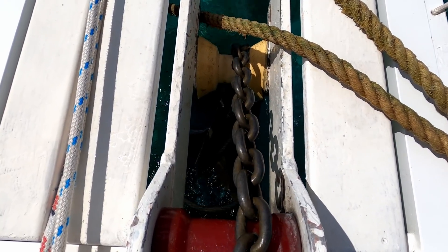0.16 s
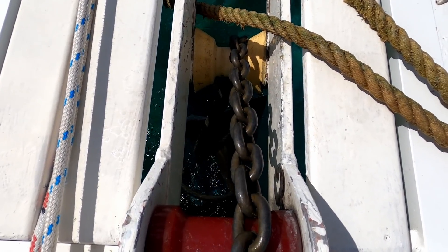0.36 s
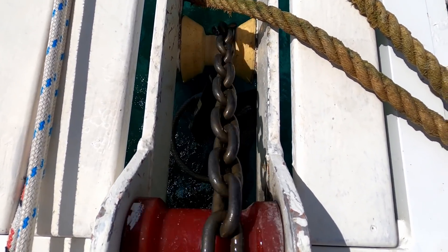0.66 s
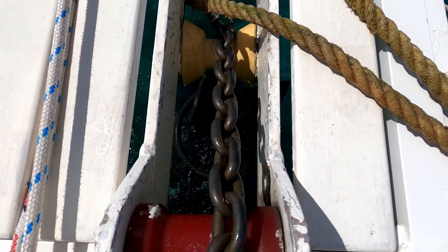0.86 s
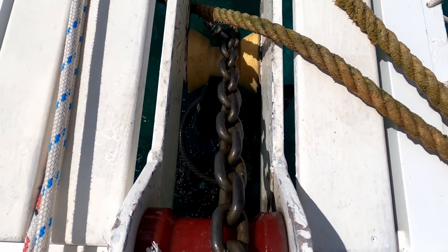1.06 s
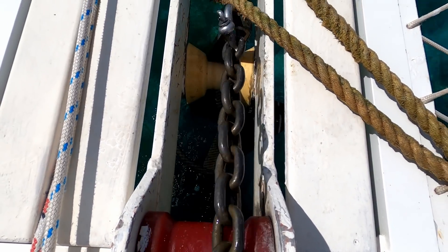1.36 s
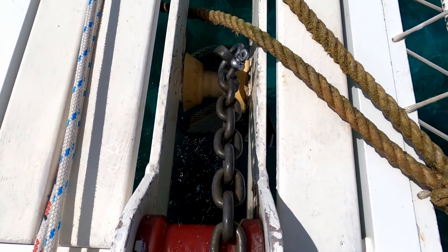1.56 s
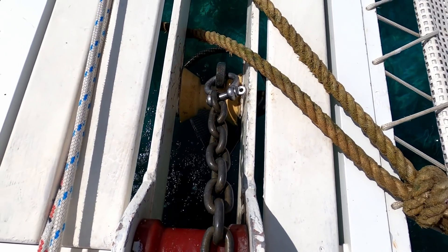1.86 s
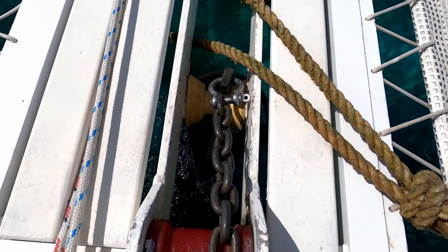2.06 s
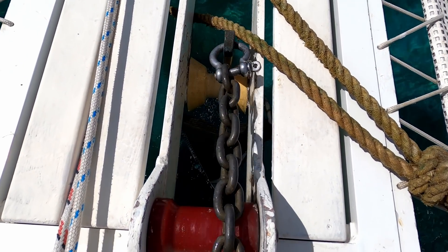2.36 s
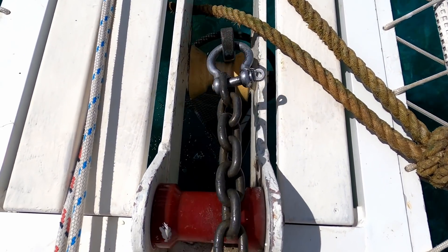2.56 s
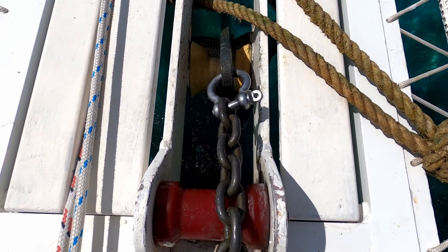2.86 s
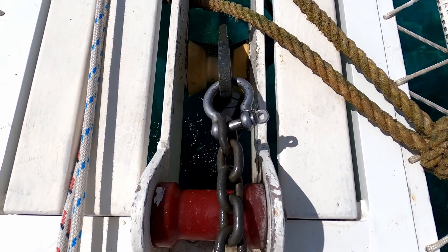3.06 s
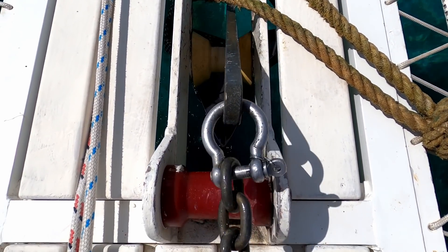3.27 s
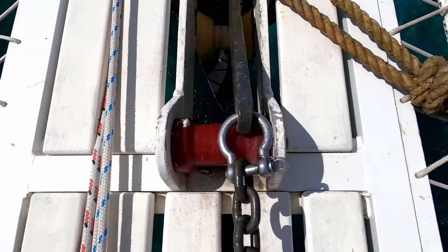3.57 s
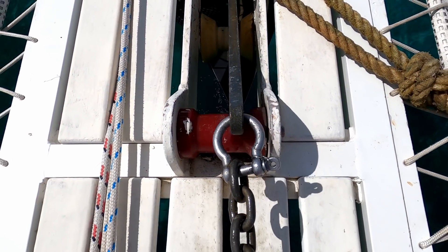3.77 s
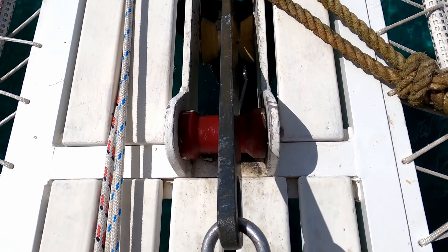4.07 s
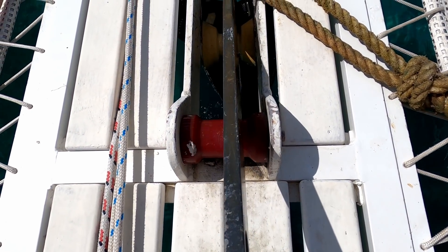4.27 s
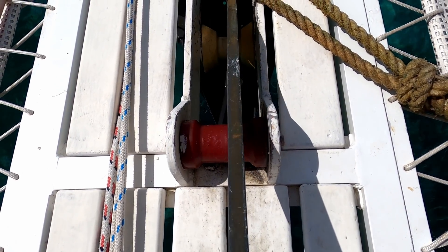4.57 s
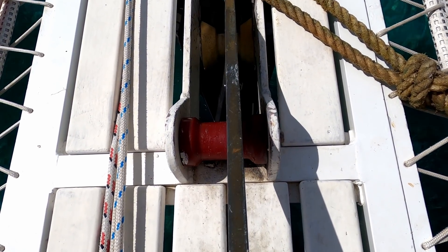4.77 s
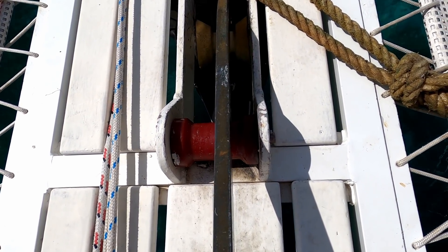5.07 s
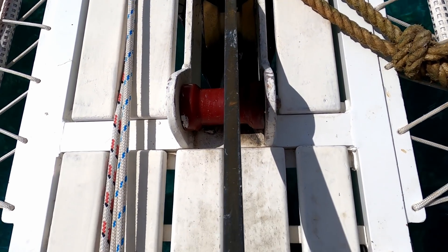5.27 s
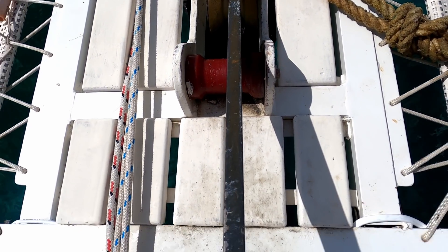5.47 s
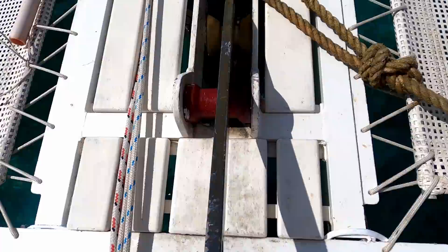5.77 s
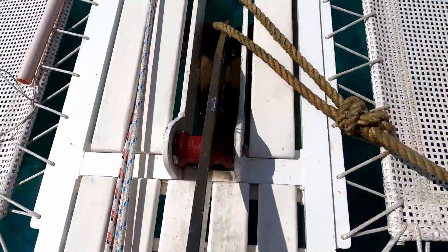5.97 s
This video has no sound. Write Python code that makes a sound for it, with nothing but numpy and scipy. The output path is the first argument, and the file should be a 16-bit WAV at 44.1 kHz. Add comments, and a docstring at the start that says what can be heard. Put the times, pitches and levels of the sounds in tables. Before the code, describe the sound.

Outdoors on deck, microphone near the roller: bright, gritty chain rattle in separate bursts over low engine rumble. Two seconds in, it briefly pauses with just a dull jolt, then sharper steel blows return, with short metallic pings and a short hollow echo from the chain channel. A deep knock lands as the anchor shank seats, the hull rumbles briefly, and the idle and wash are left alone.

```python
"""At the bow of a boat, an anchor chain is winched in over a roller in short pulls, close to a microphone.
Links grind and clank: random grit and short noise bursts set the tuned modes of the steel ringing.
The frame, deck and hull boom under many small blows, one heavy thud lands, and lone modes ping.
An engine idles below deck as a stack of sine waves, with shaped noise for the engine and water wash."""
import sys
import numpy as np
from scipy import signal
from scipy.io import wavfile
from scipy.ndimage import uniform_filter1d, map_coordinates

SR = 44100
rng = np.random.default_rng(int(sys.argv[2]) if len(sys.argv) > 2 else 0)


def pcm_store(signal):
    """Save signal as 16-bit PCM."""
    levels = np.round(np.clip(np.atleast_2d(signal), -1, 1) * 32767)
    wavfile.write(sys.argv[1], SR, levels.astype(np.int16).T)


N = 270333

ENGINE_HZ, ENGINE_LEAD_S = 29.725, 0.0102  # rate of the first engine order, and its head start
# ringing modes of the chain links: (frequency [Hz], width [Hz], level [dB])
LINK_MODES = [(2746, 61, 5.5), (3840, 58, 1.5), (4837, 260, 8.5), (5270, 400, 11), (6350, 990, -2.5),
              (7540, 400, 2), (8350, 230, -1.5), (9710, 600, -5.5), (12200, 1800, -7)]
# ringing modes of the roller frame: (frequency [Hz], width [Hz], level [dB])
FRAME_MODES = [(975, 29, 6), (1093, 60, 5), (1321, 81, 4), (1543, 82, 0), (1720, 53, -2.5), (2127, 240, 1),
               (2435, 19, 0), (2640, 17, -3), (2773, 110, -1.5), (3320, 130, -1), (3500, 33, -6),
               (3834, 170, -3)]
# ringing modes of the deck: (frequency [Hz], width [Hz], level [dB])
DECK_MODES = [(243, 10, -8.5), (272.6, 30, -3.5), (326.6, 65, 7.5), (430, 28, -1.5), (493, 56, -7),
              (550, 2.7, -2), (597, 5.5, -7), (658, 3.5, 1.5), (775, 5.9, -19)]


def gain_of(db):
    """Turns decibels into a plain multiplier."""
    return 10 ** (np.asarray(db) / 20)


def evened(x):
    """Scales a signal to an rms (average strength) of 1."""
    return x / np.sqrt(np.mean(x ** 2) + 1e-20)


def curves(rows):
    """Draws straight lines between the rows of a table: one value per sample for each column."""
    s, *columns = np.transpose(rows)
    return [np.interp(np.arange(N) / SR, s, c) for c in columns]


def add(mix, s, sound):
    """Mixes a sound in at time s, cut off at the end of the mix."""
    part = mix[round(s * SR):][:len(sound)]
    part += sound[:len(part)]


def band(x, lo_hz, hi_hz, order=2):
    """Keeps mainly the frequencies between two limits."""
    return signal.sosfilt(signal.butter(order, [lo_hz, hi_hz], "band", fs=SR, output="sos"), x)


def ring(x, modes, shifting_db=0, count=1):
    """Adds up resonances, which can trade strength as the contact point moves."""
    out, power, steady = np.zeros(len(x)), 0, 0
    for hz, width, db in modes:
        r = np.exp(-np.pi * width / SR)
        top = [(1 - r * r) / 2, 0, (r * r - 1) / 2]  # gives a gain of 1 at the peak
        bottom = [1, -2 * r * np.cos(2 * np.pi * hz / SR), r * r]
        mode = x
        for _ in range(count):  # filtering twice makes darker valleys between the modes
            mode = signal.lfilter(top, bottom, mode)
        gain = gain_of(db)
        if shifting_db:
            gain = gain * wander(0.018, shifting_db)
        out += gain * mode
        power = power + gain ** 2 * width
        steady = steady + gain_of(db) ** 2 * width
    return out * np.sqrt(steady / power)  # evens out the total strength while the modes trade


def body(x, modes, lo_hz, hi_hz, broad_db, shifting_db=0):
    """A struck part: clear modes over a broad mass of weak ones, which is the input let through."""
    return band(ring(x, modes, shifting_db) + gain_of(broad_db) * x, lo_hz, hi_hz)


def grit(per_s, spread_db):
    """Small impacts at random moments, of uneven size and either sign."""
    size_db = spread_db * np.minimum(rng.exponential(1, N), 4)
    size = gain_of(size_db) * rng.choice([-1, 1], N)
    return evened(size * (rng.random(N) < per_s / SR))


def wander(span_s, depth_db):
    """A random gain around 1, drifting in straight lines between points span_s apart."""
    steps = np.arange(0, N / SR + 1, max(span_s, 0.002))
    drift = evened(uniform_filter1d(rng.standard_normal(len(steps)), size=2))
    return np.interp(np.arange(N) / SR, steps, gain_of(depth_db * drift))


def while_on(rows):
    """1 between the first and last row of a table, with quick edges."""
    t = np.arange(N) / SR
    return np.clip(np.minimum(t - rows[0][0], rows[-1][0] - t) / 0.02, 0, 1)


def grind_levels():
    """Gain of the grinding on the roller, one curve for each stretch of contact."""
    # links grinding on the roller, one list per stretch of contact: (time [s], level [dB])
    stretches = [
        [(.57, -82.5), (.676, -47.5), (.725, -51), (.745, -57), (.78, -51.5), (.96, -50.5), (.987, -62)],
        [(.992, -52.5), (1.19, -47.5), (1.21, -46.5), (1.328, -42.5), (1.508, -51.5), (1.53, -66.5),
         (1.63, -58)],
        [(2.4, -41), (2.42, -46.5), (2.53, -45.5), (2.55, -58.5), (2.634, -55.5), (2.865, -61.5)],
        [(3.02, -53), (3.22, -54), (3.245, -62), (3.66, -92)],
        [(3.8, -61), (3.9, -47.5), (3.99, -63), (4.085, -45.5), (4.13, -61.5)],
        [(4.14, -57), (4.208, -43.5), (4.29, -49), (4.33, -59), (4.376, -42.5), (4.445, -65.5)],
        [(4.45, -52), (4.56, -50), (4.645, -56.5), (4.71, -52.5), (4.79, -81.5)],
    ]
    return [while_on(rows) * gain_of(curves(rows)[0]) for rows in stretches]


def clinks():
    """Small separate link contacts: random impacts set off short rings, each of its own pitch."""
    t, out = np.arange(1500) / SR, np.zeros(N)
    for hz in np.geomspace(1500, 10000, num=24) * rng.uniform(0.95, 1.05, size=24):
        one_ring = gain_of(-60 * t / 0.022) * np.sin(2 * np.pi * hz * t)
        out += signal.oaconvolve(grit(5, 3.0), one_ring)[:N]
    return evened(out)


def grinding():
    """Links rub on the roller: dense grit rings their modes, over a rough scrape and small clinks."""
    # how clearly the link modes sing over the scrape, one value per stretch: level [dB]
    sing_levels = [0.5, -0.5, -1, 0, -6.5, 0.5, -1]
    # upper link modes, one value per stretch; shackle and anchor shank scrape duller than chain: level [dB]
    sheen_levels = [6, 3.5, 5, 7.5, 0.5, -1, 2.5]
    rub = grit(1500, 0.78)
    links = evened(band(ring(rub, LINK_MODES, shifting_db=4, count=2), 2200, 15000))
    # the pitch drifts a little: no two links ring at quite the same pitch
    links = map_coordinates(links, [np.cumsum(wander(0.05, 0.2))])
    upper = band(links, 7900, 14000)
    scrape = gain_of(-6.0) * evened(band(rub, 2800, 8000))
    scrape = scrape + gain_of(-22.0) * evened(band(rub, 10000, 17000))
    scrape = scrape + gain_of(-6.0) * clinks()
    out = np.zeros(N)
    for level, sing_db, sheen_db in zip(grind_levels(), sing_levels, sheen_levels):
        singing = gain_of(sing_db) * (links - upper) + gain_of(sheen_db) * upper
        out += level * (scrape + singing)
    judder = wander(0.0091, 1.7) * wander(0.017, 1.5)
    return judder * out


def clanks():
    """Each clank is a short chatter of steel on steel; the modes near where it lands ring most."""
    # clanks: (time [s], level [dB], centre [Hz], link share [dB], deck share [dB],
    # chatter time to fall 60 dB [s], limited below)
    blows = [(.0064, -52, 940, -6.5, -30, 0.13), (0.5683, -44, 2810, -7.5, 0, 0.099),
             (0.6015, -38, 2750, -1.5, -24, 0.069), (0.6335, -30, 1060, -45, -5, 0.075),
             (.6757, -34, 2460, -12, 0, 0.034), (0.7163, -34.5, 2680, -7, -4, 0.017),
             (0.813, -39, 1520, 4, -9.5, 0.032), (0.8309, -32.5, 2800, -13, -2, 0.065),
             (0.858, -29, 2530, -25, -6.5, 0.045), (.9175, -30.5, 2770, -26, -8, 0.069),
             (0.941, -34, 2740, 0, -5, 0.028), (1.029, -36, 2090, -2.5, -9, 0.1),
             (1.1039, -36.5, 2300, -3.5, -18, 0.038), (1.116, -30, 2480, -4.5, -8.5, 0.047),
             (1.1344, -29, 1080, -15.5, -3.5, 0.13), (1.2655, -28.5, 1270, -6.5, -5, 0.076),
             (1.309, -34, 2730, 3.5, -13, 0.045), (1.3277, -32, 2800, 6, -24.5, 0.02),
             (1.387, -33, 1100, -23, 0.5, 0.045), (1.4066, -29, 2570, -12, -6, 0.069),
             (1.5414, -33, 1770, -13, -18, 0.052), (1.5682, -34, 1240, -23, -6, 0.087),
             (1.5954, -35.5, 1320, -10.5, 7, 0.06), (1.701, -44.5, 1260, -16, -13, 0.1),
             (1.7761, -44, 1230, -23, 5, 0.05), (1.9962, -46, 1040, -36, 3, 0.073),
             (2.2163, -53.5, 1100, -16, -7, .05), (2.2973, -54.5, 990, -4.5, -20, 0.37),
             (2.3361, -30.5, 2140, -2.5, -29, 0.078), (2.3792, -27.5, 1150, -23, -4.5, 0.088),
             (2.4067, -34.5, 2470, -15, 8, 0.11), (2.564, -26, 2480, -19, -21, 0.029),
             (2.586, -31, 1150, -15, -31, 0.036), (2.625, -35, 1740, -7.5, -19, .04),
             (2.668, -31, 2620, -21, 0, 0.036), (2.7064, -31, 1410, -35, -15, 0.038),
             (2.776, -45, 2270, -28, -23.5, .25), (2.9125, -53.5, 2170, -5, -11.5, 0.014),
             (3.0105, -30.5, 2200, -3.5, -24.5, 0.06), (3.043, -28, 980, -29.5, 2.5, 0.086),
             (3.0934, -23, 2080, -37, -10, 0.048), (3.265, -24, 1970, -13, -12, 0.047),
             (3.3577, -33, 950, -17, -5.5, 0.1), (3.4093, -21.5, 1950, -19.5, -12, 0.066),
             (3.51, -36.5, 2190, -13, -2.5, 0.06), (3.5903, -22, 1260, -19, -15, 0.087),
             (3.787, -28, 2004, -6.5, -26, 0.063), (3.826, -31, 1000, -29, -6, 0.078),
             (3.8648, -25.5, 1400, -19, -11, 0.041), (3.9255, -28.5, 1640, -30, -7, 0.084),
             (3.938, -22, 1300, -25, -22, 0.023), (3.9598, -27, 2720, -28, -13, 0.021),
             (3.9771, -30.5, 2420, -28, 0, 0.037), (4.0183, -21, 1700, -20, -9, 0.042),
             (4.0675, -28.5, 1320, -30, -19, .06), (4.14, -21.5, 1540, -25, -17, 0.039),
             (4.3497, -36, 1400, -12.5, -10.5, 0.094), (4.4511, -28, 1900, -6, -23, 0.061),
             (4.4855, -27.5, 1000, -28, 0, 0.059), (4.563, -33.5, 1310, -10.5, -6, 0.095),
             (4.6305, -23, 1830, -25, -17.5, 0.034), (4.6618, -24, 1890, -14, -11, 0.036),
             (4.685, -31.5, 1520, -22.5, -5, 0.041), (4.698, -26, 1540, -27, -5, 0.039),
             (4.7130, -32, 3320, -24.5, -11, 0.043), (4.7245, -19, 2240, -26, -9.5, 0.022),
             (4.7975, -34, 1270, -25, -13.5, 0.03), (4.943, -47, 2010, -24, 5.5, 0.043),
             (5.7605, -59, 3000, -13.5, -11, 0.022), (5.823, -64, 2800, -17, -15, .025),
             (5.8534, -52, 2160, -7, -19, .03), (5.878, -55, 2200, -18, -20, 0.028),
             (5.894, -44, 1800, -10, -10, 0.024), (6.01, -52.5, 2300, -13, -11, 0.019),
             (6.019, -51, 1890, -22, -4, 0.025)]
    out, t = np.zeros(N), np.arange(5000) / SR
    for s, db, centre_hz, link_db, deck_db, t60 in blows:
        fade_db = -60 * (t / np.clip(t60, 0.01, 0.3)) ** 1.57  # holds a moment, then dies fast
        chatter = rng.standard_normal(len(t)) * gain_of(fade_db) * (1 - np.exp(-t / 0.0018))
        near = [(hz, width, m - 4.8 * abs(np.log2(hz / centre_hz))) for hz, width, m in FRAME_MODES]
        near.append((centre_hz, 110, 5.0))  # the spot itself rings too
        parts = [(near, 0.42 * centre_hz, 2.35 * centre_hz, 0),
                 (LINK_MODES, 4300, 10000, link_db),
                 (DECK_MODES, 230, 950, deck_db)]
        sound = np.zeros(len(t))
        for modes, lo, hi, part_db in parts:
            luck = rng.standard_normal((13, 2))  # every blow shifts the pitches and levels a little
            struck = [(hz * (1 + 0.017 * a), 1.9 * width + 30, m + 4.4 * b)
                      for (hz, width, m), (a, b) in zip(modes, luck)]
            part = band(body(chatter, struck, lo, hi, -17.0), 0.57 * lo, 2.1 * hi)
            sound += gain_of(part_db) * part / abs(part).max()
        smooth_end = np.minimum(t[::-1] / 0.03, 1)
        add(out, s, gain_of(db) * sound * smooth_end)
    return out


def hauling():
    """The running chain shakes frame, deck and hull with uneven small blows."""
    # ringing modes of the hull: (frequency [Hz], width [Hz], level [dB])
    hull_modes = [(87.4, 54, -2), (107, 42, 9.5), (151.1, 14, 8.5), (166, 9.1, -7)]
    # one list per pull of the winch, the second a mere jolt:
    # (time [s], deck boom level [dB], hull drumming level [dB])
    winch_pulls = [
        [(0.568, -65, -59), (0.652, -42, -44), (1.216, -50, -43.5), (1.282, -37, -36), (1.498, -50.5, -44.5),
         (1.608, -43.5, -36.5), (1.7, -53, -62)],
        [(1.96, -72, -50), (2.002, -41.5, -40.5), (2.032, -55, -36), (2.08, -68, -47)],
        [(2.338, -58, -54), (2.382, -37.5, -53.5), (2.476, -45.5, -37.5), (2.534, -33.5, -37.5),
         (2.564, -38, -37), (2.84, -57, -57), (2.87, -59.5, -53)],
        [(3.012, -56, -59), (3.05, -34.5, -40.5), (3.202, -42.5, -37.5), (3.222, -35.5, -40), (3.506, -46, -42),
         (3.602, -42, -46), (3.7, -54, -51.5)],
        [(3.788, -57, -51), (3.826, -34, -51), (3.904, -43.5, -37.5), (3.984, -35, -36.5), (4.042, -40, -43),
         (4.158, -39, -33.5), (4.44, -51, -50.5)],
        [(4.45, -60, -43.5), (4.496, -33.5, -38.5), (4.592, -41.5, -39.5), (4.672, -39.5, -41.5),
         (4.734, -31, -34), (4.772, -43.5, -43), (4.8, -46, -36.5)],
    ]
    # hull rumble after the thud starts: (hold [s], level [dB], time to fall 60 dB [s])
    hold_s, rumble_db, rumble_t60_s = (0.1, -31.5, 0.24)
    rumble_s = 4.738  # start of the rumble
    boom_t60_s = 0.7  # the deck dies away after a pull
    lean_db, lean_db_per_s = -3.0, 1.41  # upper deck modes gain as the load nears the roller
    frame_grind_db, frame_boom_db = -4, -15.5  # the roller frame follows both grinding and boom

    frame = evened(body(grit(700, 2.5), FRAME_MODES, 860, 4300, -16, shifting_db=5.0))
    deck = evened(body(grit(1200, 2.6), DECK_MODES, 230, 1500, -10.0, shifting_db=6.5))
    hull = evened(body(grit(2000, 4.4), hull_modes, 72, 210.5, -12.5))
    t, judder = np.arange(N) / SR, wander(0.011, 1.7)
    deck = deck + (gain_of(lean_db + lean_db_per_s * t) - 1) * band(deck, 520, 1600)

    boom, drum = np.zeros(N), np.zeros(N)
    for rows in winch_pulls:
        boom_db, drum_db = curves(rows)
        onset = np.clip((t - rows[0][0]) / 0.0089, 0, 1)
        on = onset * gain_of(-60 * np.maximum(t - rows[-1][0], 0) / boom_t60_s)
        boom = np.maximum(boom, on * gain_of(boom_db))
        drum = np.maximum(drum, on * gain_of(drum_db))
    fading_s = np.maximum(t - rumble_s - hold_s, 0)
    drum += np.clip((t - rumble_s) / 0.01, 0, 1) * gain_of(rumble_db - 60 * fading_s / rumble_t60_s)

    shake = gain_of(frame_grind_db) * sum(grind_levels()) + gain_of(frame_boom_db) * boom
    # light parts feel the judder most
    return shake * frame * judder ** 0.81 + boom * deck * judder ** 0.54 + drum * hull * judder ** 0.073


def thud():
    """One heavy blow: a sine wave falls quickly in pitch and booms down into the hull."""
    # the anchor shank seats on the roller: (time [s], peak level [dB], time to fall 60 dB [s])
    s, db, t60 = (4.727, -20, .11)
    t, out = np.arange(SR // 4) / SR, np.zeros(N)
    hz = 110 + 560 * np.exp(-t / 0.0105)
    add(out, s, gain_of(db - 60 * t / t60) * np.sin(2 * np.pi * np.cumsum(hz) / SR))
    return out


def pings():
    """Lone steel modes dying away, each beating against a weaker neighbour and trembling."""
    # single modes set ringing by a blow or a glancing tick:
    # (time [s], frequency [Hz], level [dB], time to fall 60 dB [s])
    lone_modes = [(1.6, 2200, -55.5, 0.35), (1.645, 655, -45, 0.27), (2.585, 2740, -35, 0.035),
                  (2.66, 673, -53, 0.92), (3.093, 6800, -38, 0.023), (3.222, 4340, -38, 0.02),
                  (3.266, 6670, -37, 0.016), (3.358, 4120, -37, 0.016), (3.42, 7130, -42, 0.02),
                  (3.514, 3610, -49.5, 0.22), (3.515, 4790, -53.5, 0.24), (3.63, 650, -43, 0.6),
                  (3.894, 6800, -36.5, 0.031), (4.352, 650, -38, 0.33), (4.686, 594, -30, 0.26),
                  (4.724, 3380, -25, 0.024), (4.76, 560, -43.5, 0.34)]
    t, out = np.arange(SR // 2) / SR, np.zeros(N)
    for s, hz, db, t60 in lone_modes:
        neighbour_hz = hz * rng.uniform(1.015, 1.07)
        pair = np.sin(2 * np.pi * hz * t) + 0.25 * np.sin(2 * np.pi * neighbour_hz * t)
        add(out, s, gain_of(db - 60 * t / t60) * (1 - np.exp(-t / 0.00076)) * pair)
    return out * wander(0.0058, 4.0)


def locker(x):
    """The chain channel and hollow deck answer with a short, dulling tail of fading noise."""
    t = np.arange(SR // 2) / SR
    low, mid, high = rng.standard_normal((3, len(t))) * np.clip((t - 0.004) / 0.00093, 0, 1)
    tail = band(low, 340, 990) * gain_of(-60 * t / 0.5)
    tail += band(mid, 1000, 4000) * gain_of(6.5 - 60 * t / 0.27)
    tail += band(high, 3200, 14000) * gain_of(-14.5 - 60 * t / 0.3)
    return signal.fftconvolve(x, tail / np.linalg.norm(tail))[:N]


def engine():
    """Firing orders (multiples of one steady rate); a lag skews each pulse, and upper orders waver."""
    # the idling engine as heard at the bow:
    # (time [s], first order level [dB], second order level [dB], third order level [dB])
    throb = [(0, -45, -56, -54), (.48, -40, -55, -50), (1.1, -41, -52, -49), (1.55, -37, -48, -43),
             (1.9, -34, -52, -41), (2.45, -33, -48, -42), (2.95, -33, -45, -43), (3.45, -38, -46, -43),
             (3.85, -35, -45, -44), (4.5, -36, -49, -46), (4.95, -40, -50, -50), (5.35, -35, -46, -49),
             (5.7, -32, -57, -44), (6.13, -36, -49, -47)]
    # upper orders: (multiple of the rate, level against the third order [dB])
    high_orders = [(4, -21), (5, -16), (6, -22), (7, -24)]
    first, second, third = gain_of(curves(throb))
    t = np.arange(N) / SR
    turn = 2 * np.pi * ENGINE_HZ * (t + ENGINE_LEAD_S)
    lean = 0.95 - 0.14 * t  # the pulses lean (radians per order), less so later
    orders = [(1, first), (2, second), (3, third)]
    for k, db in high_orders:
        orders.append((k, third * gain_of(db) * wander(0.14, 0.75)))
    # the root of 2 makes each order's level its rms; the lean stops growing at the third order
    return sum(np.sqrt(2) * size * np.cos(k * turn + min(k - 1, 2) * lean) for k, size in orders)


def wash():
    """Engine and water wash: noise built from random short-time spectra with drifting patches."""
    # colour of the wash, of which only the shape counts: (frequency [Hz], level per Hz [dB])
    colour = [(30, -29.5), (45, -12.5), (75, -16.5), (100, -11.5), (125, -27.5), (229, -25.5), (400, -37.5),
              (685, -37.5), (1200, -47), (1900, -55), (2400, -59.5), (3300, -58), (4000, -65.5),
              (6400, -75.5), (15000, -86)]
    # strength of the wash, set by its 300-1500 Hz part: (time [s], level [dB])
    strength = [(0, -69), (2.3, -58.5), (3.75, -60.5), (5.3, -67), (6.13, -61)]
    frames, hz = N // 256 + 5, np.fft.rfftfreq(1024, 1 / SR)
    a, b, patches = rng.standard_normal((frames, 513, 3)).T
    patches = evened(uniform_filter1d(uniform_filter1d(patches, 12, 0), 10, 1))
    f, db = np.transpose(colour)
    colour_db = np.interp(np.log(hz + 1), np.log(f), db)[:, None]
    spectra = (a + 1j * b) * gain_of(colour_db + 2.4 * patches)
    x = signal.istft(spectra, nperseg=1024, noverlap=768)[1][:N]
    turn = 2 * np.pi * ENGINE_HZ * (np.arange(N) / SR + ENGINE_LEAD_S)
    x = x * (1 + 0.13 * np.cos(turn))  # breathes with the firing
    return x / np.std(band(x, 300, 1500)) * gain_of(curves(strength)[0])


def scene():
    """Everything reaches one microphone, so both channels are the same."""
    steel = clanks() + grinding() + hauling() + thud()
    mono = steel + pings() + gain_of(-16.5) * locker(steel) + engine() + wash()
    return np.array([mono, mono])


def record(dry):
    """The microphone dulls the top octave; then a steep filter sets the band limit."""
    dulled = signal.sosfilt(signal.butter(2, 12500, fs=SR, output="sos"), dry)
    limit = signal.firwin(511, 15730, window=("kaiser", 9), fs=SR)  # cutoff in Hz
    return signal.oaconvolve(dulled, limit[None], "same")


dry = scene()
out = record(dry)
pcm_store(out)
```